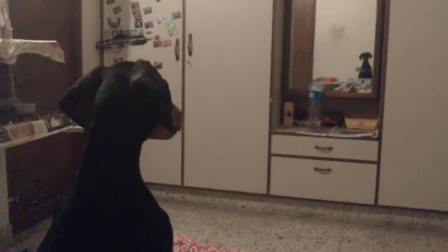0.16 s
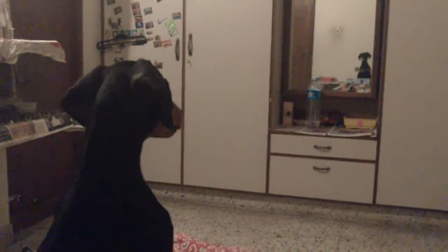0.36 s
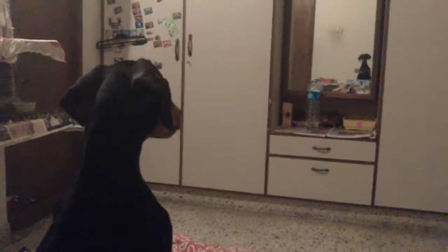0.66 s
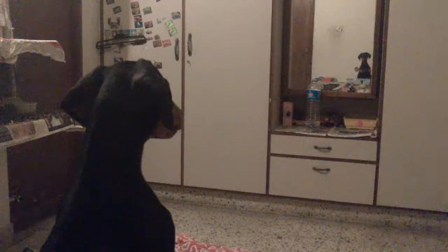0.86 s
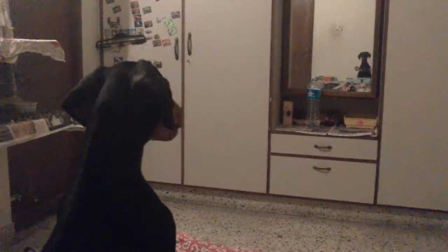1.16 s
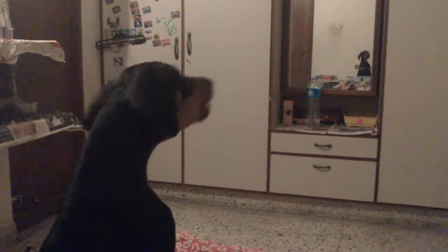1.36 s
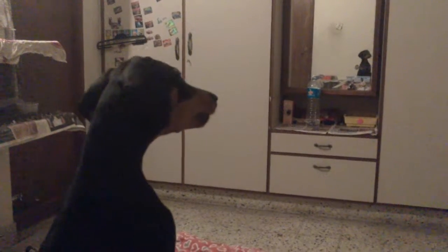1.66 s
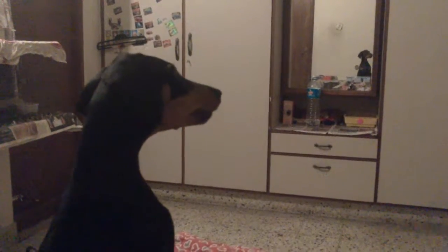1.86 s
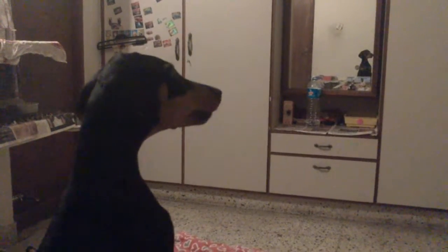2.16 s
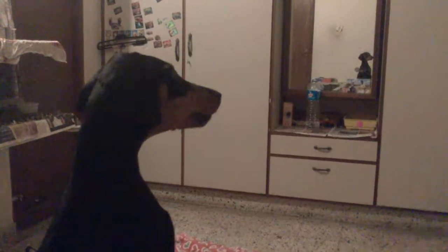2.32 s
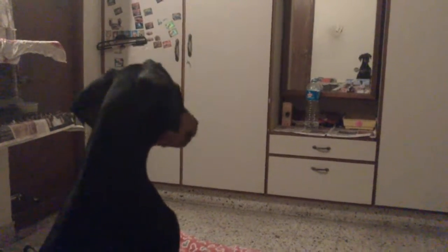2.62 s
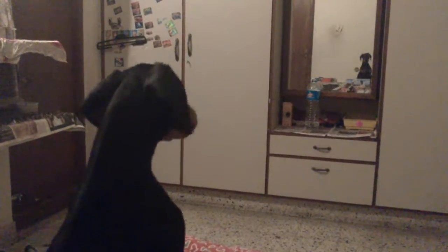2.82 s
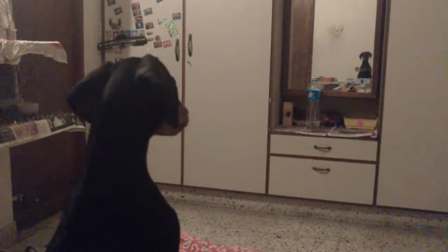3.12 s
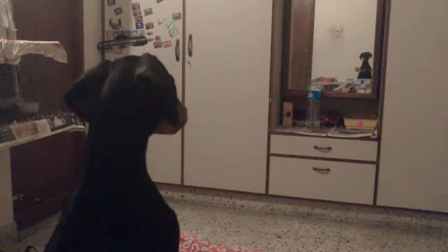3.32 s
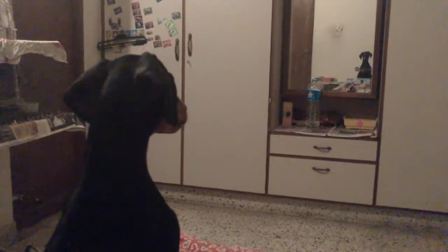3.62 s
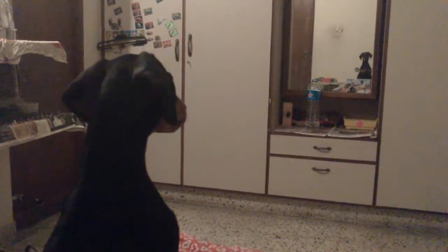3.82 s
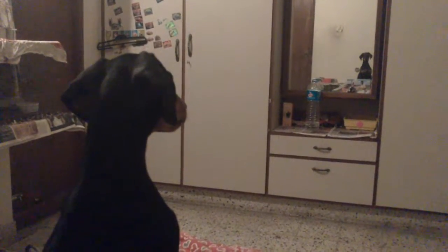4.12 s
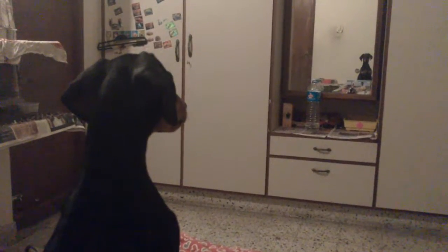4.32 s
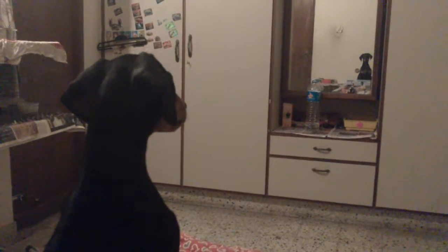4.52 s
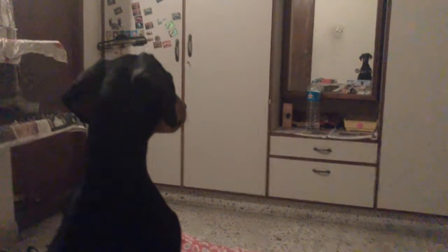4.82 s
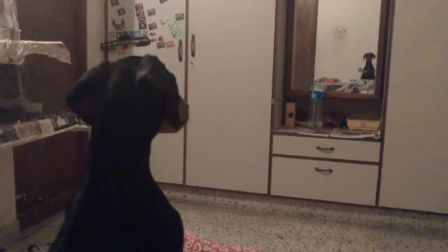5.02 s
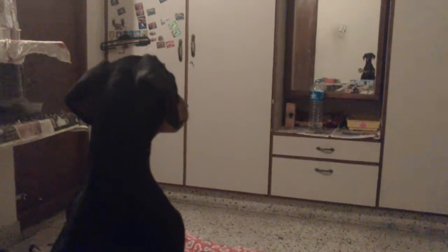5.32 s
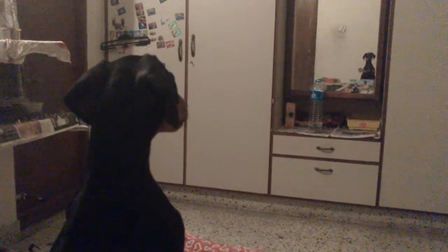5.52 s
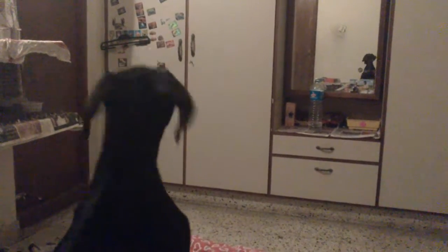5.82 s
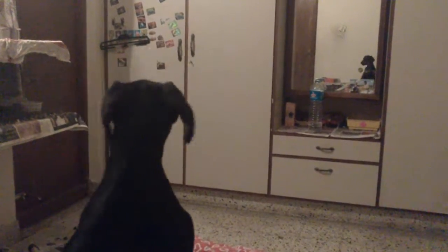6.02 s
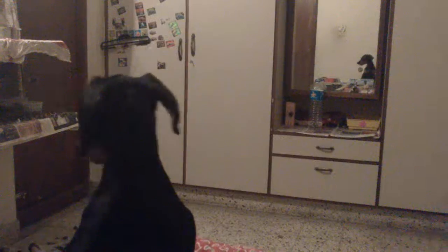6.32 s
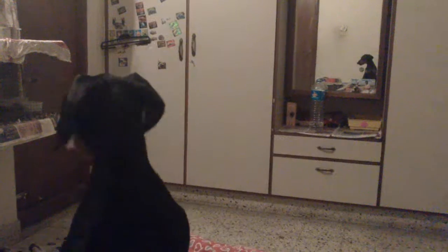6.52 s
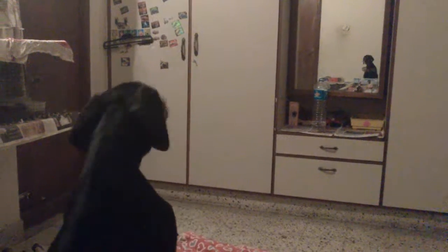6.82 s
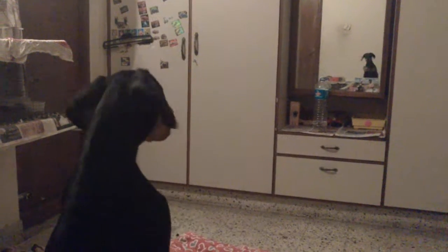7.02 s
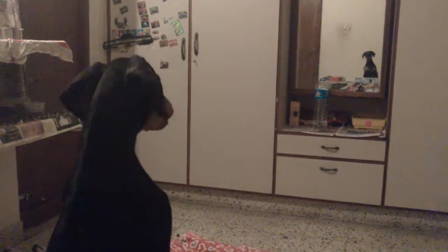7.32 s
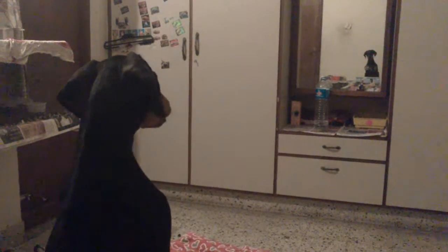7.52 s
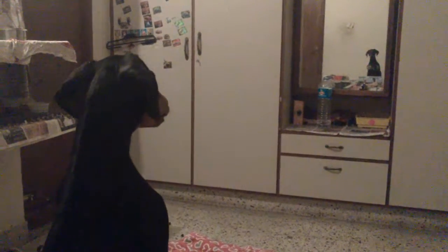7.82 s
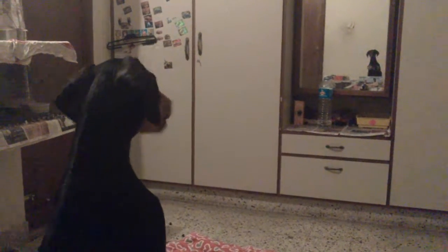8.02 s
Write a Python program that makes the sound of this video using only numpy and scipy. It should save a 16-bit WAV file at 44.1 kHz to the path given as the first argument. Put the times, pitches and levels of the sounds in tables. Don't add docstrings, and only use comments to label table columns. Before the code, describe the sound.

Four single barks from a big dog, unevenly spaced, each very short with a deep chesty start that jumps to a high yelping pitch. Rough, fluttering low growls lead into the first, second and last; the third bursts out of silence. A brief huff and nasal snort come after the first. Close stereo pickup indoors, hard walls answering for about half a second, quiet low room rumble and soft hiss.

```python
import sys
import numpy as np
from scipy import signal
from scipy.fft import rfft, irfft, next_fast_len
from scipy.io import wavfile
from scipy.ndimage import uniform_filter1d

SR = 44100
rng = np.random.default_rng(int(sys.argv[2]) if len(sys.argv) > 2 else 0)


def elevation(decibels):
    levels = np.asarray(decibels, float)
    return 10 ** (levels / 20)


def put_to_file(sound):
    columns = np.atleast_2d(sound).T
    safe = np.clip(columns, -1, 1)
    whole_steps = np.round(safe * 32767)
    wavfile.write(sys.argv[1], SR, whole_steps.astype(np.int16))


N = 359856

# f/Hz, level/dB per Hz
AIR_SPECTRUM = [(8.8, -27.5), (15, -7), (19, -8.5), (22, -15), (54, -13.5), (80, -20.5), (164, -29.5),
                (217, -34.5), (435, -38.5), (487, -48), (529, -40), (680, -43), (11600, -58), (15100, -91),
                (22000, -120)]
# f/Hz, likeness/-1..1
AIR_LIKENESS = [(30, .9), (150, .9), (500, .6), (900, .2), (1800, -.3), (4000, -.1), (9000, 0)]
# f shut/Hz, f open/Hz, width/Hz, level shut/dB, level open/dB
RESONANCES = [(115, 110, 93, 7.5, -27.5), (300, 370, 140, -12, -18.5), (414.5, 430, 100, -8, -11.5),
              (740, 850, 280, -23.5, -2.5), (880, 1400, 680, -35.5, -8), (2950, 1750, 300, -52.5, -6.5),
              (3300, 2650, 920, -78.5, -6), (3400, 4600, 450, -41.5, -35), (5400, 4300, 700, -42.5, -47.5),
              (7647, 7900, 1600, -72.5, -19), (11275, 11000, 4200, -81, -31)]
# f/Hz, level/dB
SIDE_BRANCH = [(3500, 0), (4200, 0.5), (4700, -9), (5200, -5.5), (5800, -20.5), (6300, -7.5), (7000, 0.5),
               (11200, 0.5), (12400, -19.5)]
# t/s, effort/dB, pulse rate f/Hz, mouth opening/0..1
GROWL_CURVES = [
    [(.25, -72, 104.7, 0.06), (.4, -61.5, 109.8, 0.04), (.6, -59, 115, 0), (.85, -58.5, 105.6, .01),
     (1., -52, 104.3, 0), (1.17, -51, 107.1, 0), (1.21, -44, 109.5, .2), (1.295, -39.5, 133.3, 0.3)],
    [(4.72, -68, 105, 0.14), (4.85, -57.5, 104.9, 0.05), (4.95, -52.5, 109.1, 0), (5.23, -50.5, 115, 0),
     (5.45, -53.5, 114.7, 0), (5.74, -56.5, 110.5, 0), (5.83, -44, 118.3, .05)],
    [(7., -29.5, 155.2, 0.61), (7.1, -35.5, 123.7, .3), (7.25, -37.5, 117.5, 0.35),
     (7.45, -41.5, 103.8, 0.15), (7.58, -45, 102.5, 0.1), (7.65, -53.5, 106.5, 0),
     (7.9, -52.5, 110.2, 0.04), (8., -50, 113.9, 0.07), (8.08, -41.5, 129.7, 0.31)],
]
# f/Hz, t60/s
ROOM_DECAY = [(120, 0.16), (250, .62), (660, 0.47), (1740, 0.48), (4590, .47), (9000, 0.48), (14000, .22)]
# f/Hz, likeness/0..1
ROOM_LIKENESS = [(100, .99), (300, .94), (700, .85), (1500, .55), (3000, .3), (8000, .2)]
# f/Hz, width/Hz, level/dB
STANDING_WAVES = [(712, 8.2, 2.5), (748, 9, -4), (1485, 11, -7), (2140, 12, -6), (2256, 12, -8)]
# onset t/s, delay of register jump t/s, delay of crest t/s, top level/dB, top pitch f/Hz
BARK_EVENTS = [
    (1.308, .037, 0.07, -10, 721),
    (5.84, .04, .069, -7.5, 759.2),
    (6.81, .021, 0.0704, -11, 752.5),
    (8.094, .04, .074, -10.5, 728),
]
# t after onset/s, effort/dB, pulse rate f/Hz, irregularity/0..1,
# mouth opening/0..1
CHEST_OPENING = [(0, -27.5, 192.5, .2, 0.6), (.017, -25.5, 235.8, .2, 0.91), (.034, -19.5, 292, .15, .99)]
# t after jump/s, then columns as above
CHEST_CLOSING = [(.022, -35, 309.8, .2, .9), (.078, -32, 300, .15, 0.7), (.114, -24, 224.1, .06, .8),
                 (.133, -36.5, 158, .25, .5), (.158, -60.5, 135, .3, .4)]
# t after jump/s, level/dB
SECOND_PARTIAL = [(0, -23.5), (.032, -16), (.052, 0.5), (.07, -2), (.113, -9.5)]
# t after jump/s, level/dB
THIRD_PARTIAL = [(0, -8), (.035, -9), (.06, -20.5), (.113, -11.5)]
# t after jump/s, level/dB
YELP_BREATH = [(0, -20), (.06, -20.5), (.113, -10.5)]
# t/s, effort/dB, pulse rate f/Hz, mouth opening/0..1
HUFF_CURVE = [(2.755, -46.5, 120.6, .08), (2.785, -35, 186, 0.19), (2.798, -27, 226, .7),
              (2.828, -20.5, 217.6, 0.69), (2.85, -64, 183.2, 0.77), (2.882, -60, 169, 0.3)]
# t/s, level/dB
SNORT_LEVEL = [(2.8, -63), (2.85, -53), (2.92, -48), (3., -71), (3.04, -90), (3.07, -95)]
# f/Hz, level/dB per Hz
NOSE_SPECTRUM = [(1400, -17), (2500, -9), (3300, -4), (5900, -8), (7400, -0.5), (9200, -11.5), (11600, -11),
                 (14500, -14), (15700, -24.5), (16300, -70)]
# t/s, level/dB
SNIFF_LEVEL = [(3.05, -100), (3.15, -82), (3.4, -86), (3.6, -88), (3.75, -100)]
# f/Hz, left minus right level/dB
PORT_LEVEL = [(60, 5.5), (200, 3.), (500, 1.5), (1200, 4.5), (2500, 0.5), (4500, -1), (7000, -11.5),
              (9500, -9.5), (12000, 4.5)]
# f/Hz, lead/radians
PORT_PHASE = [(100, 0), (1200, .1), (2000, -.7), (3500, -1.3), (7000, -1.6), (12000, 1.3)]

WARM_RASP_DB, COLD_RASP_DB = 2, -10
YELP_S, SNAP_S, DROP_S, CUT_S = .113, .015, .02, .018
SILENT_DB, SWELL_DB_PER_S, DROP_DB, SAG_DB = -42, 171, -12, -18
RISE, RISE_S, FALL, RISE_BEND, FALL_BEND = .11, .035, .29, 2.1, 1.8


def evened(x):
    return x / np.sqrt(np.mean(x ** 2) + 1e-20)


def read(points, hz):
    f, value = np.transpose(points)
    return np.interp(np.log(hz + 1), np.log(f + 1), value)


def columns(rows):
    s, *values = np.transpose(rows)
    t = np.arange(s[0], s[-1], 1 / SR)
    return s[0], [np.interp(t, s, v) for v in values]


def add(mix, s, sound):
    part = mix[round(s * SR):][:len(sound)]
    part += sound[:len(part)]


def wander(n, hz):
    pole = np.exp(-hz * 2 * np.pi / SR)
    return evened(signal.lfilter([1], [1, -2 * pole, pole ** 2], rng.standard_normal(n)))


def resonate(x, hz, width):
    turn = np.exp(2j * np.pi * np.cumsum(hz * np.ones(len(x))) / SR)
    r = np.exp(-np.pi * width / SR)
    smooth = signal.lfilter([(1 - r) ** 2], [1, -2 * r, r * r], x / turn + 1e-18)
    return 2 * (turn * smooth).real


def coloured(x, gain):
    size = next_fast_len(N + SR)
    return irfft(rfft(x, size) * gain(np.fft.rfftfreq(size, 1 / SR)), size)[..., :N]


def air():
    hz = np.fft.rfftfreq(N, 1 / SR)
    left, other = rfft(rng.standard_normal((2, N)))
    same = np.clip(read(AIR_LIKENESS, hz), -1, 1)
    right = same * left + np.sqrt(1 - same ** 2) * other
    both = np.array([left, right]) * elevation(read(AIR_SPECTRUM, hz))
    return elevation(-58.74 + .5 * wander(N, 2.5)) * evened(irfft(both, N))


def tract(low, high, mouth):
    total = 0
    for k, (shut_hz, open_hz, width, shut_db, open_db) in enumerate(RESONANCES):
        drive = high if shut_hz > 2000 else low
        hz = shut_hz + (open_hz - shut_hz) * mouth ** .6
        gain = elevation(shut_db + (open_db - shut_db) * mouth)
        total = total + (-1) ** k * gain * resonate(drive, hz, width)
    return total


def chest(rows):
    s, (effort_db, hz, rough, mouth, rasp_db) = columns(rows)
    rough, mouth = np.clip(rough, 0, 1), np.clip(mouth, 0, 1)
    jitter, shimmer_db, weak = .15, 8.5, .6
    turns = np.cumsum(hz * np.exp(jitter * rough * wander(len(hz), 40))) / SR
    cycle = turns.astype(int)
    shimmer = elevation(shimmer_db * rough * rng.uniform(-0.88, 1, 400)[cycle % 400])
    size = shimmer * (1 - weak * rough * (cycle % 2))
    pulses = size * np.diff(cycle, prepend=0) * np.sqrt(SR / hz)
    puffs = size * (0.48 + np.exp(-(turns % 1) / 0.48)) * rng.standard_normal(len(hz))
    rasp = elevation(rasp_db) * (.3 * pulses + 1.3 * puffs)
    rasp = signal.lfilter([.6], [1, -.4], rasp)
    hum = elevation(3.5 - 30 * mouth ** 1.5) * np.sin(2 * np.pi * turns)
    hum *= elevation(-7 * np.maximum(np.log2(hz / 117), 0))
    hum += elevation(-5.0) * mouth * np.sin(4 * np.pi * turns)
    hum += elevation(2.5) * mouth ** 3 * np.sin(6 * np.pi * turns)
    voiced = 7 * tract(pulses + rough * puffs, rasp, mouth)
    return s, elevation(effort_db) * (voiced + (1 - rough ** 2) * size ** .5 * hum)


def growl(points):
    rows = []
    for s, db, hz, mouth in points:
        rough = .74 - .02 * (db + 57.5)
        rasp_db = np.clip(.53 * (db + 55), -7, 9.5)
        rows.append((s, db, hz, rough, mouth, rasp_db))
    return rows


def room(x):
    taps = np.zeros((2, SR))
    at = np.arange(260, SR - 20, 20) + rng.integers(0, 20, (2, (SR - 261) // 20))
    np.put_along_axis(taps, at, rng.choice([-1., 1.], at.shape), 1)
    hz, t, z = signal.stft(taps, SR, nperseg=512)
    same = np.clip(read(ROOM_LIKENESS, hz), 0, 1)[:, None]
    z = np.array([z[0], same * z[0] + np.sqrt(1 - same ** 2) * z[1]])
    decay = elevation(-60 * t / read(ROOM_DECAY, hz)[:, None])
    tail = signal.istft(z * decay, SR, nperseg=512)[1]
    return signal.fftconvolve(x[None], tail / np.linalg.norm(tail[0]), axes=1)[:, :N]


def standing(x):
    return sum(elevation(db) * resonate(x, hz, width) for hz, width, db in STANDING_WAVES)


def bark(onset, jump, rasp_db):
    opening = [(onset + s, *rest, rasp_db) for s, *rest in CHEST_OPENING]
    closing = [(onset + jump + s, *rest, rasp_db) for s, *rest in CHEST_CLOSING]
    return opening + closing


def arch(onset, jump, peak, top_db, top_hz):
    t, crest = np.linspace(0, YELP_S, num=60), peak - jump
    corners_s = [0, SNAP_S, crest, crest + DROP_S, YELP_S - CUT_S, YELP_S]
    corners_db = [SILENT_DB, -SWELL_DB_PER_S * (crest - SNAP_S), 0, DROP_DB, SAG_DB, SILENT_DB]
    level_db = top_db + np.interp(t, corners_s, corners_db)
    below_before = RISE * (np.maximum(crest - t, 0) / RISE_S) ** RISE_BEND
    below_after = FALL * (np.maximum(t - crest, 0) / (YELP_S - crest)) ** FALL_BEND
    hz = top_hz * (1 - below_before - below_after)
    partials = [np.interp(t, *np.transpose(p)) for p in (SECOND_PARTIAL, THIRD_PARTIAL, YELP_BREATH)]
    return np.column_stack([onset + jump + t, level_db, hz] + partials)


def yelp(rows):
    s, (level_db, hz, second_db, third_db, breath_db) = columns(rows)
    flutter = .011
    turns = 2 * np.pi * np.cumsum(hz * (1 + flutter * wander(len(hz), 60))) / SR
    tone = np.sin(turns) + elevation(second_db) * np.sin(2 * turns) + elevation(third_db) * np.sin(3 * turns)
    tone += elevation(third_db - 18.5) * np.sin(4 * turns) + elevation(third_db - 23) * np.sin(5 * turns)
    breath = (1 + 0.88 * np.cos(turns)) * rng.standard_normal(len(hz))
    return s, elevation(level_db + 5.0) * (tone + elevation(breath_db) * evened(tract(breath, breath, 1.)))


def huff():
    rough, rasp_db = .75, -12
    return [(s, db, hz, rough, mouth, rasp_db) for s, db, hz, mouth in HUFF_CURVE]


def snort():
    s, (level_db,) = columns(SNORT_LEVEL)
    n = len(level_db)
    hz = np.fft.rfftfreq(n, 1 / SR)
    hiss = irfft(rfft(rng.standard_normal(n)) * elevation(read(NOSE_SPECTRUM, hz)), n)
    return s, elevation(level_db + 2.4 * wander(len(hiss), 34)) * evened(hiss)


def sniff():
    s, (level_db,) = columns(SNIFF_LEVEL)
    return s, elevation(level_db) * evened(resonate(rng.standard_normal(len(level_db)), 3100, 110))


def breaths():
    rasps = [WARM_RASP_DB, WARM_RASP_DB, COLD_RASP_DB, WARM_RASP_DB]
    first, second, third, last = [bark(*row[:2], rasp) for row, rasp in zip(BARK_EVENTS, rasps)]
    cold = [(third[0][0] - .026, -58, 125, .3, .3, COLD_RASP_DB)]
    return [growl(GROWL_CURVES[0]) + first,
            huff(),
            growl(GROWL_CURVES[1]) + second,
            cold + third[:-2] + growl(GROWL_CURVES[2]) + last]


def ports(x):
    side = np.array([[.5], [-.5]])
    return coloured(x, lambda hz: elevation(side * read(PORT_LEVEL, hz)) * np.exp(-1j * side * read(PORT_PHASE, hz)))


def scene():
    voice, nose = np.zeros((2, N))
    for rows in breaths():
        add(voice, *chest(rows))
    for row in BARK_EVENTS:
        add(voice, *yelp(arch(*row)))
    add(nose, *snort())
    add(nose, *sniff())
    dog = coloured(voice, lambda hz: elevation(read(SIDE_BRANCH, hz))) + nose
    heard = elevation(-2.0) * dog + elevation(-1.66) * room(dog) + standing(dog)
    return ports(heard) + air()


def band_limit(x):
    return signal.sosfilt(signal.butter(12, 15800, fs=SR, output="sos"), x)


def record(dry):
    peak_db = 10 * np.log10(abs(uniform_filter1d((dry ** 2).mean(0), size=300)) + 1e-12)
    cut_db = uniform_filter1d(.6 * np.maximum(peak_db + 11, 0), size=300)
    held = dry / elevation(cut_db)
    mix = held + np.array([[0], [-.0102]])
    return band_limit(mix)


dry = scene()
out = record(dry)
put_to_file(out)
```